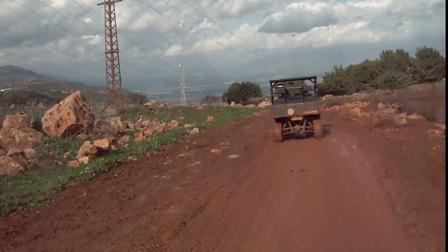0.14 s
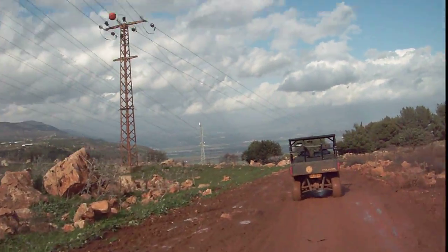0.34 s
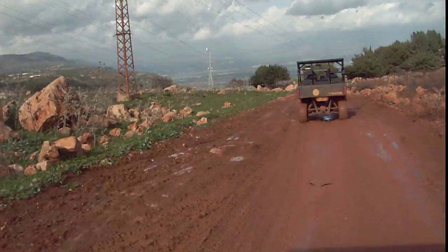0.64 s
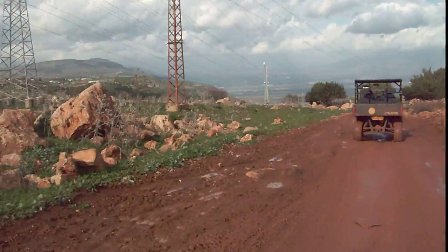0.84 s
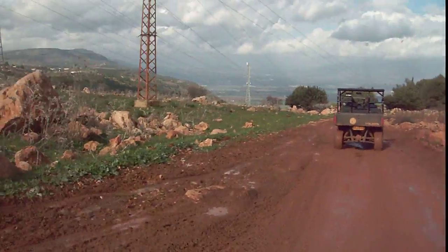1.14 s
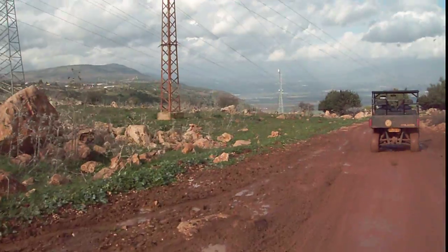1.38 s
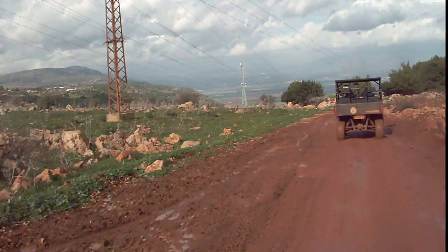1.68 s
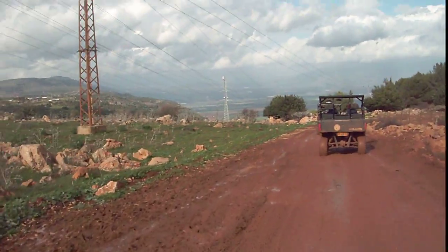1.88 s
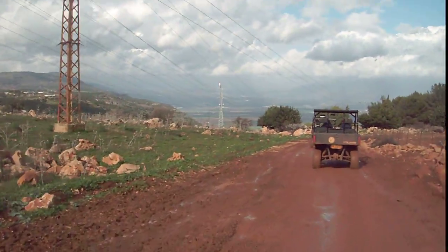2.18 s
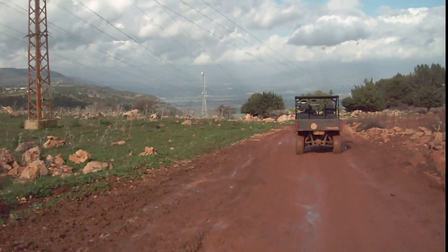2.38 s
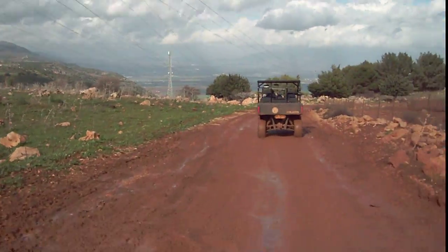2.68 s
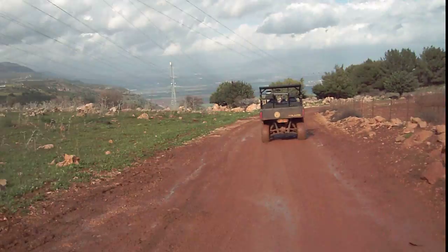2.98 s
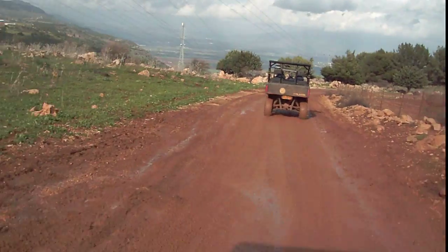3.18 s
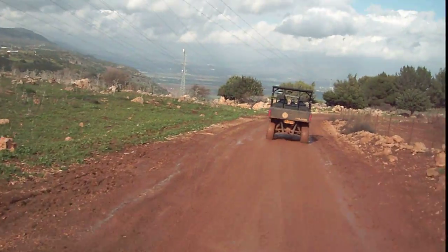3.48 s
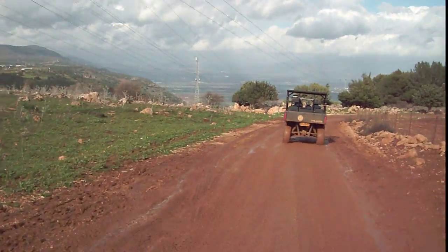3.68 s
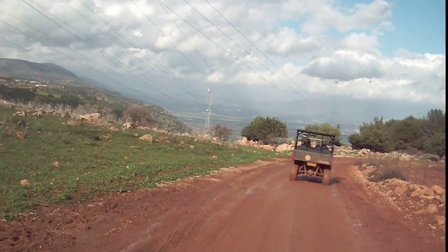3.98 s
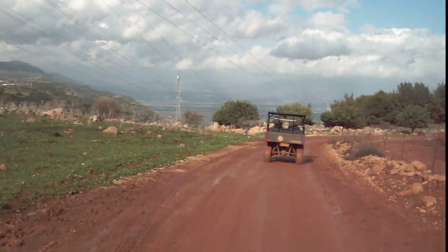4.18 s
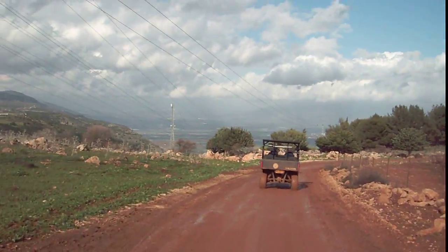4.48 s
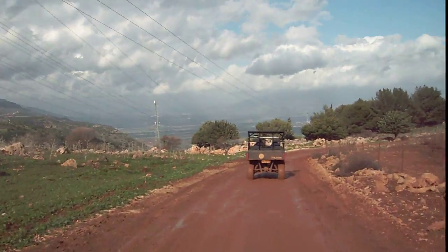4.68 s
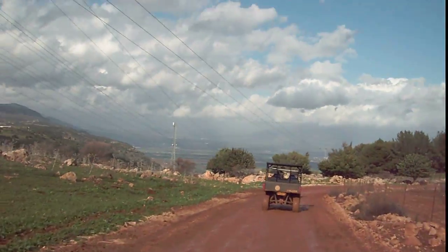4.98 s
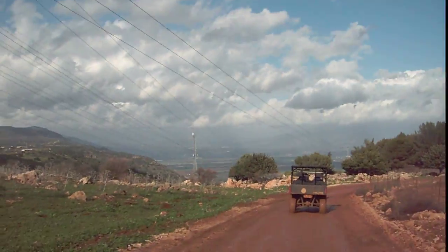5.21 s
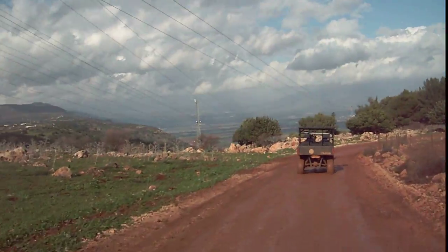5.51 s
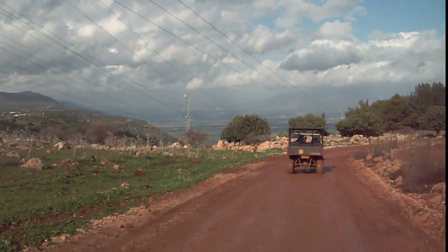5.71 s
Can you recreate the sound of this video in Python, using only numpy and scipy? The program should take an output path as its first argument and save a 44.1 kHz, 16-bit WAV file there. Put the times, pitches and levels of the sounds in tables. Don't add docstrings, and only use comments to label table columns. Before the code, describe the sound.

A buggy engine hums low over a rough dirt track, easing off midway then picking up again, with thuds, rattles and roaring tyres.

```python
import sys
import numpy as np
from scipy import signal
from scipy.io import wavfile
from scipy.ndimage import uniform_filter1d

SR = 44100
rng = np.random.default_rng(int(sys.argv[2]) if len(sys.argv) > 2 else 0)


def generate_wav(sig):
    pcm = np.round(np.clip(np.atleast_2d(sig).T, -1, 1) * 32767).astype(np.int16)
    wavfile.write(sys.argv[1], SR, pcm)


def field_ratio(decibels):
    return 10 ** (np.asarray(decibels, dtype=float) / 20)


N = 257984


def rms_one(x):
    return x / np.sqrt(np.mean(x ** 2) + 1e-20)


def peak_one(x):
    return x / np.abs(x).max()


def in_time(rows):
    s, *columns = np.transpose(rows)
    return [np.interp(np.arange(N) / SR, s, c) for c in columns]


def drift(rate_hz):
    pole = np.exp(-80 * np.pi * rate_hz / SR)
    slow = signal.lfilter([1], [1, -2 * pole, pole * pole], rng.standard_normal(N // 40 + 2002))
    slow = slow[2000:]
    return np.interp(np.arange(N) / 40, np.arange(len(slow)), rms_one(slow))


def swell(centre_s, half_s, db):
    return db * np.exp(-((np.arange(N) / SR - centre_s) / half_s) ** 2)


def band(x, low_hz, high_hz, order=2):
    return signal.sosfilt(signal.butter(order, [low_hz, high_hz], "band", fs=SR, output="sos"), x)


def coloured(spectrum, sources, patchy_db, patch_rate_hz, bells=()):
    hz, level_db = np.transpose(spectrum)
    out, together = 0, drift(patch_rate_hz / 2)
    edges_hz = 18 * 2 ** np.arange(0, 10, .5)
    for k, (low_hz, high_hz) in enumerate(zip(edges_hz, edges_hz[1:])):
        centre_hz = np.sqrt(low_hz * high_hz)
        if hz[0] * .8 < centre_hz < hz[-1] * 1.2:
            flicker_db = patchy_db * (0.23 * together + drift(patch_rate_hz))
            bell_db = sum(db * np.exp(-(np.log2(centre_hz / bell_hz) / 0.22) ** 2) for db, bell_hz in bells)
            band_db = np.interp(np.log(centre_hz), np.log(hz), level_db) + flicker_db + bell_db
            out = out + field_ratio(band_db) * band(sources[k % 2], low_hz, high_hz)
    return out


def case(x):
    # f/Hz, width/Hz, gain/dB
    modes = [(349, 46, 11.5), (446, 108, 7), (610, 174, -3), (706, 20, 6), (824, 14, 3.5), (940, 56, 4),
             (1200, 41, -2.5), (1290, 70, 5.5), (1398, 84, 6.5), (1602, 196, -6.5), (1963, 23, 3),
             (2160, 43, 3.5), (2450, 300, 1.5), (2577, 314, 6)]
    for hz, width_hz, db in modes:
        w, a = 2 * np.pi * hz / SR, field_ratio(db / 2)
        damp = np.sin(w) * width_hz / hz / 2
        zeros = [1 + damp * a, -2 * np.cos(w), 1 - damp * a]
        poles = [1 + damp / a, -2 * np.cos(w), 1 - damp / a]
        x = signal.lfilter(zeros, poles, x)
    return x


def grit(per_s, spread_db):
    sizes = field_ratio(spread_db * np.minimum(rng.exponential(1, (2, N)), 5)) * rng.choice([-1, 1], (2, N))
    return rms_one(sizes * (rng.random((2, N)) < per_s / SR))


def electronics():
    whine_hz, self_noise_db = 1966.75, -61
    # multiple, level/dB
    harmonics = [(3, -83), (4, -69), (6, -94), (7, -98), (8, -88)]
    t = np.arange(N) / SR
    whine = sum(field_ratio(db + 1) * np.sin(2 * np.pi * k * whine_hz * t) for k, db in harmonics)
    return whine + field_ratio(self_noise_db) * band(rng.standard_normal(N), 3000, 19000, order=1)


def hiss(effort_db, faster_hz):
    port_hz, port_width_hz = 9354, 1480
    level_db = -51.5 + 0.66 * effort_db + 0.14 * faster_hz + swell(centre_s=0.97, half_s=.15, db=3)
    source = rng.standard_normal(N) + 0.28 * grit(per_s=1200, spread_db=5)[0]
    port = band(source, port_hz - port_width_hz / 2, port_hz + port_width_hz / 2)
    return field_ratio(level_db + 1.0 * drift(48) + 0.46 * drift(4.3)) * rms_one(port)


def squeaks():
    # t/s, length/s, f/Hz, level/dB
    rubs = [
        (3.883, 0.053, 1340, -46),
        (3.95, 0.093, 1376, -42),
        (4.088, 0.04, 1250, -47),
        (4.107, .1, 1926, -49),
        (0.09, 0.036, 2250, -40),
        (2.667, 0.07, 1290, -49),
    ]
    t, out = np.arange(N) / SR, 0
    flutter = field_ratio(2 * np.tanh(drift(40)))
    for s, length_s, hz, db in rubs:
        shape = np.sin(np.pi * np.clip((t - s) / length_s, 0, 1)).clip(0) ** .4
        out = out + field_ratio(db + 3) * shape * np.sin(2 * np.pi * hz * t)
    return out * flutter


def pings():
    # t/s, f/Hz, level/dB, t60/s
    parts = [
        (.538, 5890, -52, .05),
        (2.735, 5190, -49, .08),
        (3.455, 5750, -48, .09),
        (3.57, 6880, -51, .06),
        (3.57, 7700, -53, .05),
    ]
    t, crack = np.arange(N) / SR, band(rng.standard_normal(N), 4000, 9000)
    out = 0
    for s, hz, db, t60_s in parts:
        decay = field_ratio(db - 60 * np.maximum(t - s, 0) / t60_s) * (t >= s)
        out = out + decay * (np.sin(2 * np.pi * hz * t) + 2.0 * crack)
    return out


def ticks():
    bright_db, decay_s = -19, .0022
    # t/s, peak level/dB
    knocks = [
        (0.1042, -16.5),
        (0.2369, -26),
        (0.3466, -18),
        (0.4045, -20),
        (0.82, -21),
        (3.5114, -20),
        (3.8337, -24),
        (4.6164, -28),
        (5.2305, -24),
    ]
    out, t = np.zeros(N + SR), np.arange(SR // 20) / SR
    for s, db in knocks:
        burst = rng.standard_normal(len(t)) * np.exp(-t / decay_s)
        dull = peak_one(case(band(burst, 1300, 3300, order=4)))
        bright = peak_one(band(burst, 4500, 9000))
        at = round(s * SR)
        out[at:at + len(t)] += field_ratio(db - 3.5) * (dull + field_ratio(bright_db) * bright)
    return out[:N]


def shake():
    swing = band(rng.standard_normal(N + SR), 4.05, 14.4)[SR:]
    even = swing / np.sqrt(uniform_filter1d(swing ** 2, size=SR // 5) + 1e-12)
    return field_ratio(-32) * even


def bumps():
    rise_s, t60_s, hard_bump_db = 0.05, 0.63, -14.5
    mount_hz, thud_hz, thud_db = 10.3, 24.2, -9.5
    # t/s, peak level/dB, way (+1 lift, -1 drop)
    track = [(0.01, -26.5, -1), (.14, -17, -1), (.24, -23, 1), (.43, -22.5, 1), (.47, -24, -1),
             (.585, -23.5, -1), (0.786, -16, -1), (0.919, -22.5, 1), (0.999, -19.5, -1), (1.13, -18, -1),
             (1.18, -23, 1), (1.33, -25, -1), (1.65, -30, -1), (2.09, -33, -1), (2.29, -32, -1),
             (2.545, -20.5, 1), (2.71, -24.5, 1), (2.85, -24.5, 1), (3.3, -26.5, 1), (3.451, -20, -1),
             (3.59, -24, -1), (4.25, -23, 1), (4.33, -23, -1), (4.51, -21, 1), (4.79, -24, 1),
             (4.98, -23.5, 1), (5.119, -26.5, 1), (5.21, -24, -1), (5.43, -23.5, 1), (5.831, -28, 1)]
    t, jolt, swing = np.arange(N) / SR, 0, 0
    for s, db, way in track:
        rise = np.exp(-(np.minimum(t - s, 0) / rise_s) ** 2)
        size = field_ratio(db - 60 * np.maximum(t - s, 0) / t60_s) * rise
        ring = np.cos(2 * np.pi * mount_hz * (t - s)) + field_ratio(thud_db) * np.cos(2 * np.pi * thud_hz * (t - s))
        jolt = np.maximum(jolt, size / field_ratio(hard_bump_db))
        swing = swing + np.sign(way) * size * ring
    return jolt, swing


def rumble(effort_db, jolt):
    # f/Hz, level/dB per Hz
    spectrum = [(25, -1.5), (50, -2.5), (100, 4.5), (170, -2), (250, -14), (400, -16.5), (600, -36),
                (900, -23)]
    level_db = -44.5 + 0.21 * effort_db + 5.5 * jolt
    noise = coloured(spectrum, rng.standard_normal((2, N)), patchy_db=1.5, patch_rate_hz=5.9)
    return field_ratio(level_db + 10.0) * rms_one(noise)


def shaft(hz, faster_hz, closed):
    level_db = -38.5 - 3.5 * closed - 0.3 * faster_hz
    return field_ratio(level_db + 2.5) * np.sin(2 * np.pi * np.cumsum(hz * (1 + 0.006 * drift(4.4))) / SR)


def roar(roar_db, phase, closed):
    # f/Hz, level/dB per Hz
    spectrum = [(300, -5.5), (600, -9), (1000, -2.5), (1800, -3), (2800, 2), (4000, -10.5), (5500, -16.5),
                (8000, -21.5), (11000, -56)]
    # centre t/s, half length/s, gain/dB
    gravel = [
        (0.0, 0.4, 2),
        (3.55, 0.54, 8),
        (5.0, 0.24, 4.5),
    ]
    pulsing = (1 + 0.028 * np.cos(2 * phase) + 0.047 * np.cos(phase)) * field_ratio(0.55 * drift(6.4))
    source = (rng.standard_normal((2, N)) + 0.45 * grit(per_s=900, spread_db=3.0)) * pulsing
    drumming_db = sum(swell(*patch) for patch in gravel)
    bells = [(-3 * closed, 3300), (drumming_db, 850)]
    noise = coloured(spectrum, source, patchy_db=0.64, patch_rate_hz=29.0, bells=bells)
    return field_ratio(roar_db) * rms_one(case(noise))


def resonance_db(hz, centre_hz, width_hz, peak_db):
    return peak_db / (1 + (2 * (hz - centre_hz) / width_hz) ** 2)


def engine(closed, jolt):
    # t/s, crank turns/Hz
    speed = [(0.0, 35.4), (.6, 36.4), (1.1, 36.3), (1.25, 35.6), (1.65, 31.3), (1.9, 30.3), (2.4, 29.6),
             (2.9, 30.3), (3.45, 30.3), (3.72, 30.2), (4.0, 33.4), (4.3, 34.9), (4.95, 36.8), (5.35, 36.4),
             (5.85, 34.0)]
    # multiple, full-throttle level/dB, loss when closed/dB, gain on a hard bump/dB
    low_orders = [(1, -36, 10, 10), (2, -33.5, 1, -2.2), (3, -35, 4.5, 3.2)]
    # multiple, full-throttle level/dB, loss when closed/dB
    upper_orders = [(1.5, -64, -24), (2.5, -46.5, 14), (4, -38.5, 19.5), (4.5, -48.5, 35), (5, -44.5, 6),
                    (5.5, -66, -22.5), (6, -61.5, -13.5), (9, -61, 18), (10, -57, 24), (11, -65, 4),
                    (12, -52.5, 17), (13, -63, -4)]
    turns_hz = in_time(speed)[0]
    phase = 2 * np.pi * np.cumsum(turns_hz * (1 + .004 * drift(5))) / SR
    out = 0
    for multiple, db, lost_db, bump_db in low_orders:
        level_db = db + 3 - lost_db * closed + bump_db * jolt + 1.2 * drift(2.5)
        out = out - field_ratio(level_db) * np.cos(multiple * phase + .4 * drift(.8))
    for multiple, db, lost_db in upper_orders:
        exhaust_db = resonance_db(multiple * turns_hz, centre_hz=361.4, width_hz=22, peak_db=10.5)
        second_exhaust_db = resonance_db(multiple * turns_hz, centre_hz=169, width_hz=17, peak_db=3.5)
        level_db = db + 3 - lost_db * closed + exhaust_db + second_exhaust_db + 2.5 * np.tanh(drift(4))
        out = out - field_ratio(level_db) * np.cos(multiple * phase + rng.uniform(-.6, .6))
    return out, phase


def scene():
    # t/s, opening (0-1)
    throttle = [(0, 0.95), (.2, 0.96), (1.15, 0.91), (1.5, 0.48), (2.4, 0.11), (3.6, 0.07), (3.85, 0.86),
                (4.4, 1), (5.3, 0.95), (5.85, 0.78)]
    # t/s, roar level/dB
    effort = [(0, -37), (.04, -31.5), (.12, -34), (.45, -34.5), (.62, -33.3), (1.0, -34), (1.35, -35),
              (1.6, -36.5), (2.15, -36.5), (2.45, -37), (3.0, -37.5), (3.75, -38), (4.05, -35.5),
              (4.4, -35.5), (4.85, -35.5), (5.4, -35.5), (5.85, -37)]
    # t/s, f/Hz
    road_speed = [(0, 120.5), (.3, 122), (.6, 130), (1.45, 132), (2.15, 119), (2.7, 123), (3.3, 124),
                  (3.6, 120), (4.25, 121.5), (5.35, 134.5), (5.85, 126)]
    closed = 1 - np.clip(in_time(throttle)[0], 0, 1)
    roar_db, shaft_hz = in_time(effort)[0], in_time(road_speed)[0]
    effort_db, faster_hz = roar_db - roar_db.mean(), shaft_hz - shaft_hz.mean()
    jolt, swing = bumps()
    tones, phase = engine(closed, jolt)
    air = hiss(effort_db, faster_hz) + roar(roar_db, phase, closed)
    loose_parts = squeaks() + pings() + ticks()
    frame = shake() + swing + rumble(effort_db, jolt) + shaft(shaft_hz, faster_hz, closed)
    return (electronics() + air + loose_parts + frame + tones)[None]


def roll_off(x):
    return signal.sosfilt(signal.butter(12, 15640, fs=SR, output="sos"), x)


def record(dry):
    return roll_off(dry)


dry = scene()
out = record(dry)
generate_wav(out)
```